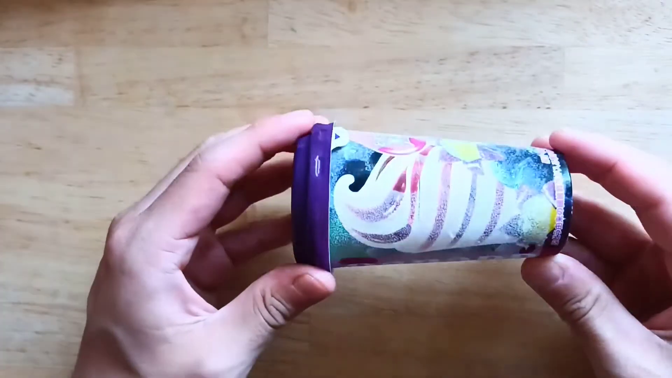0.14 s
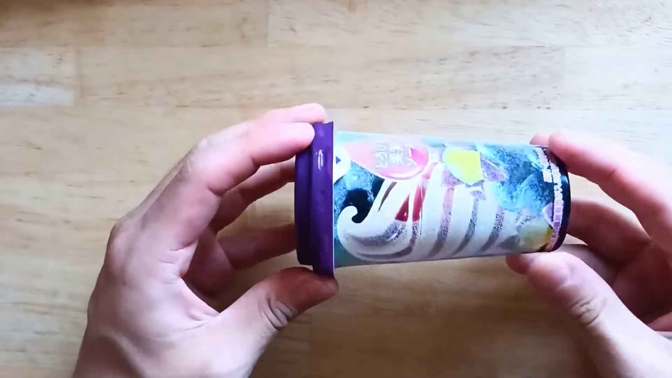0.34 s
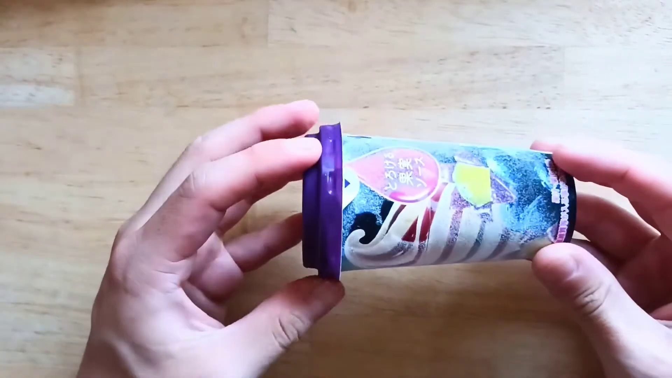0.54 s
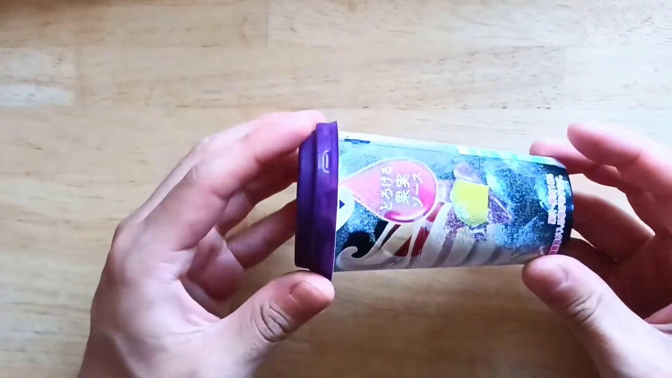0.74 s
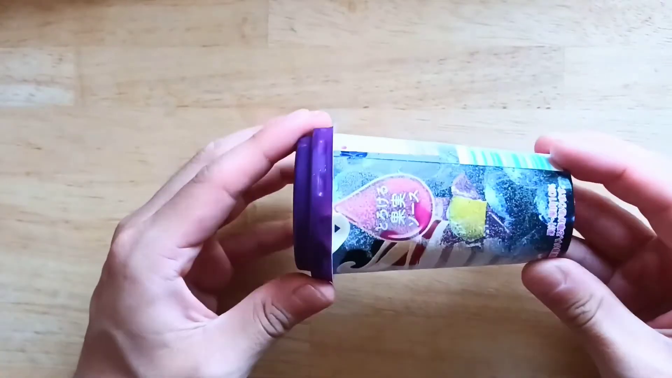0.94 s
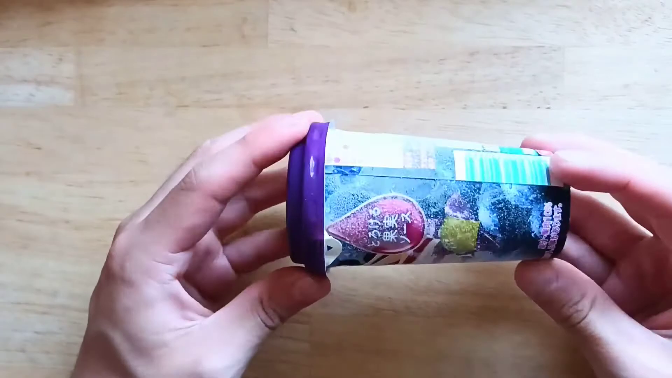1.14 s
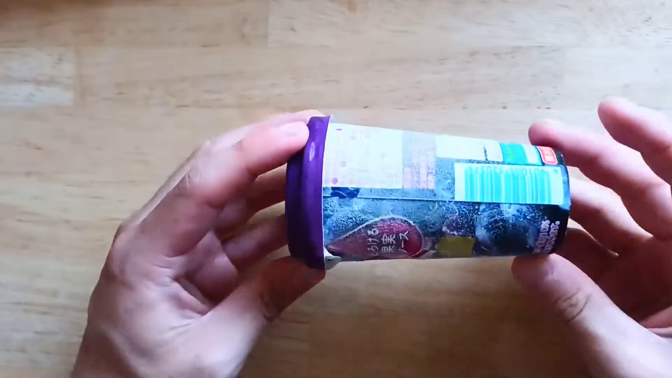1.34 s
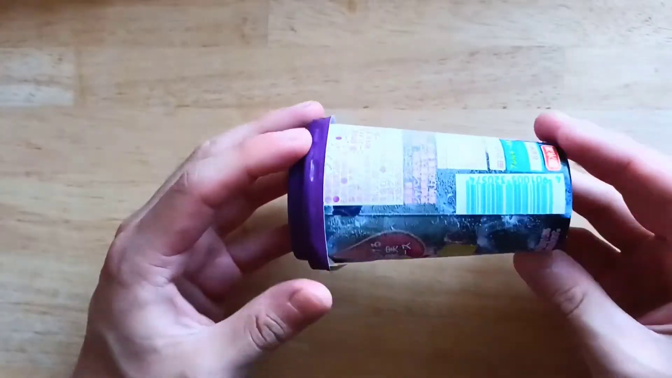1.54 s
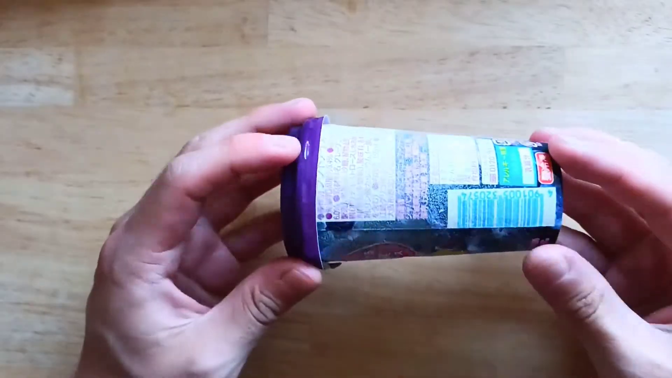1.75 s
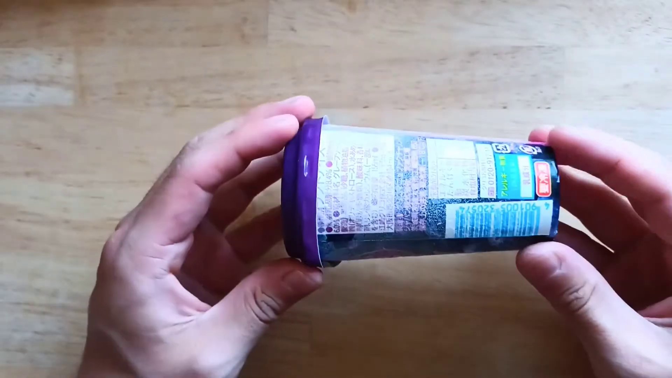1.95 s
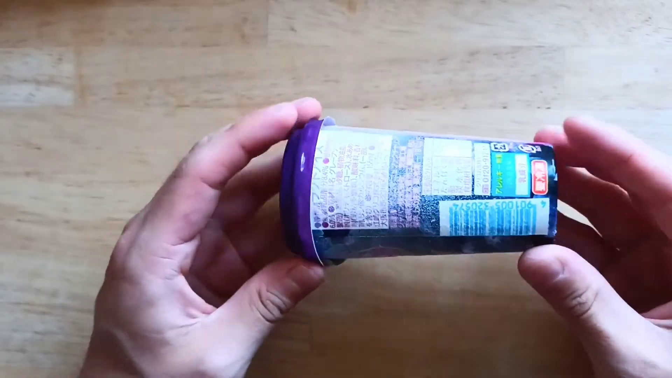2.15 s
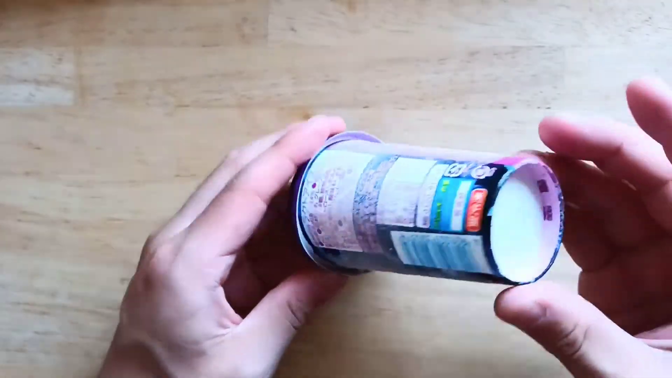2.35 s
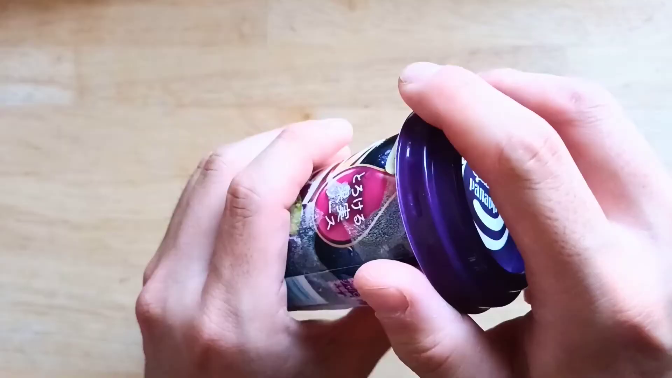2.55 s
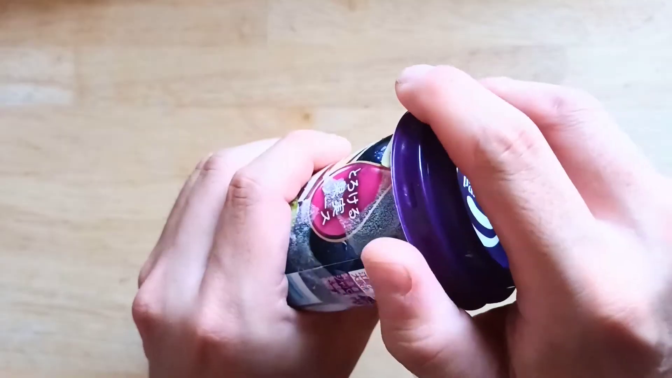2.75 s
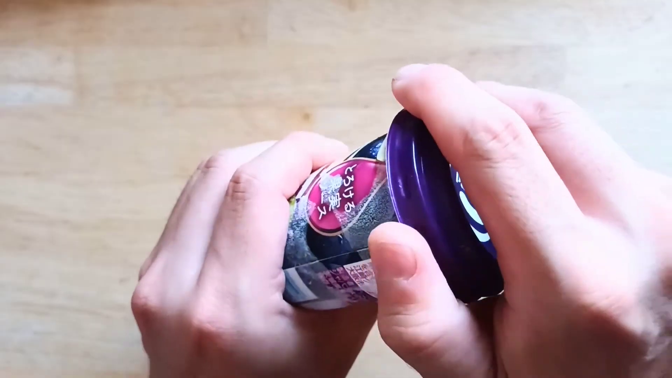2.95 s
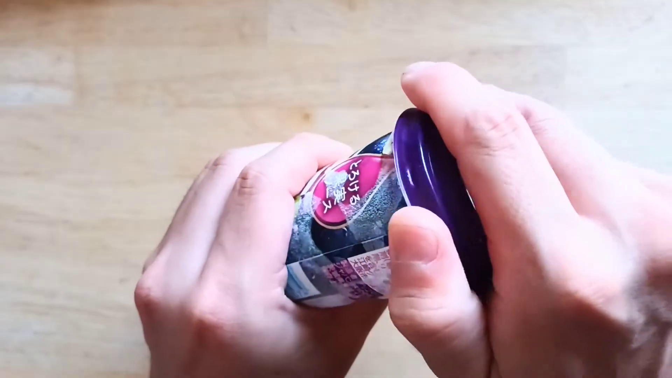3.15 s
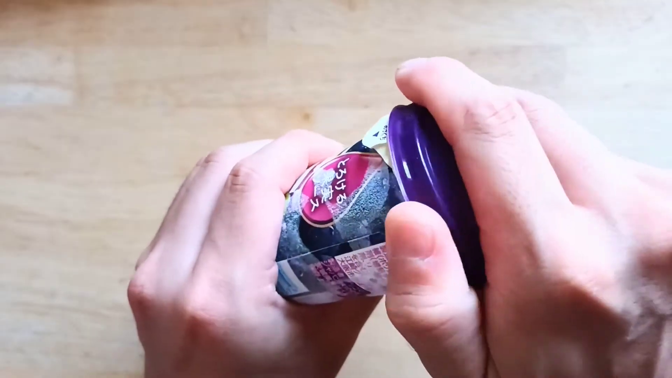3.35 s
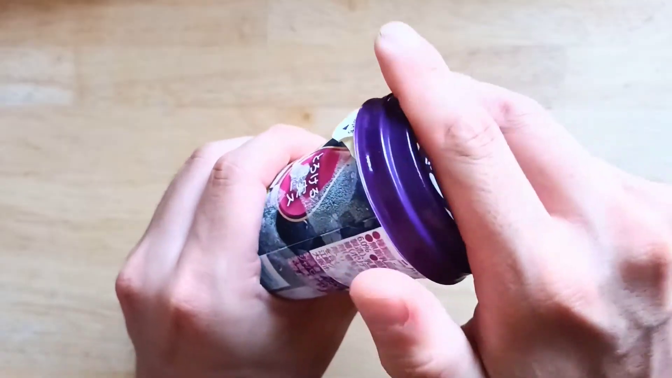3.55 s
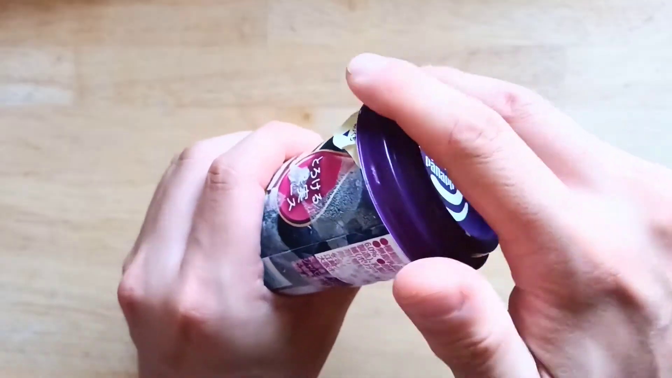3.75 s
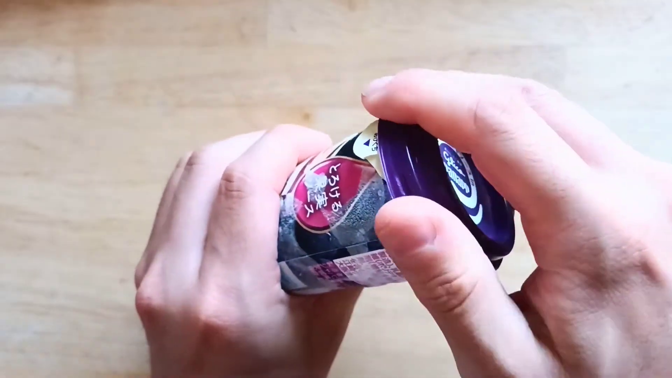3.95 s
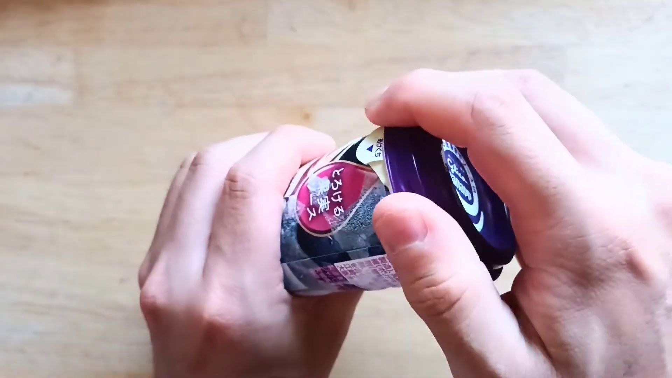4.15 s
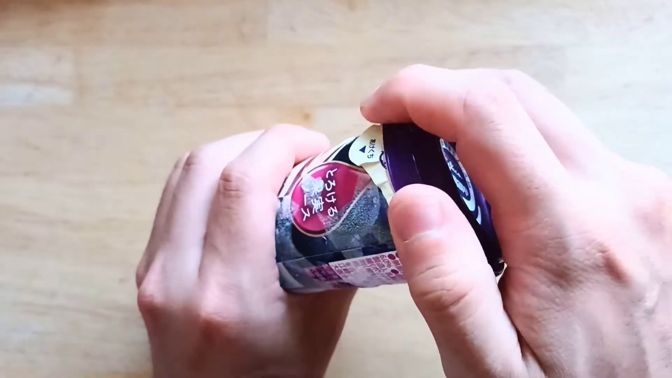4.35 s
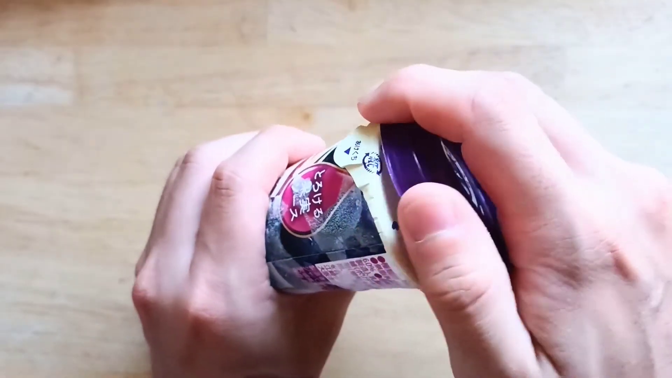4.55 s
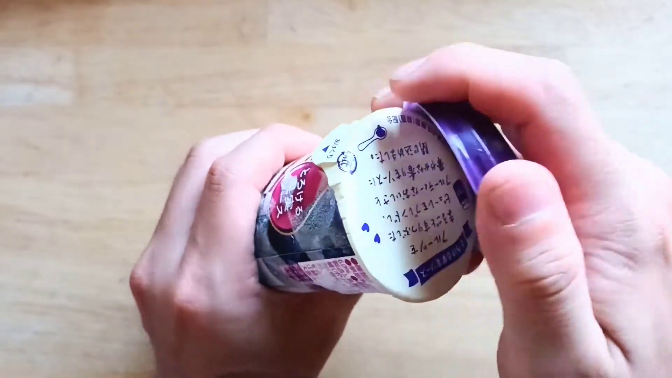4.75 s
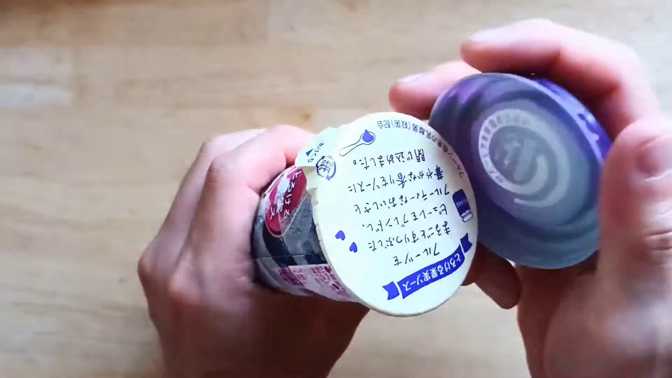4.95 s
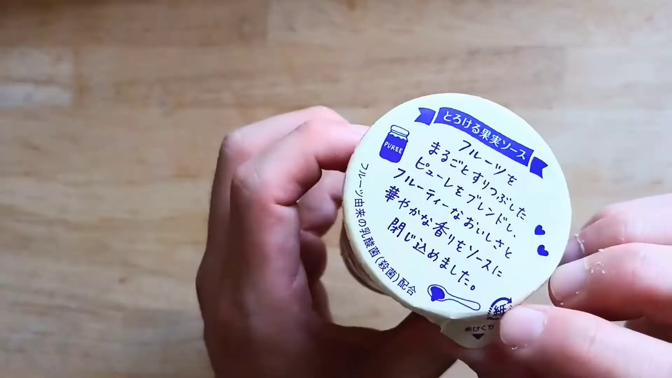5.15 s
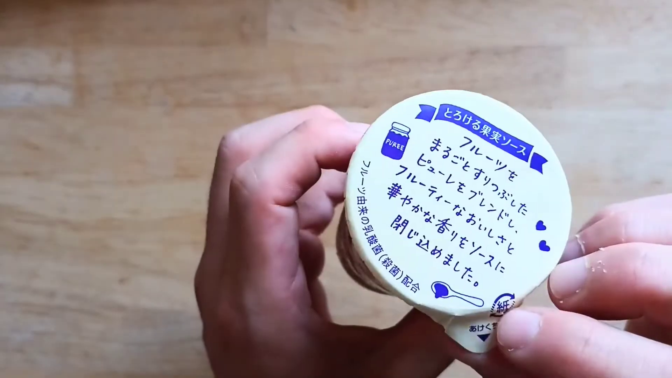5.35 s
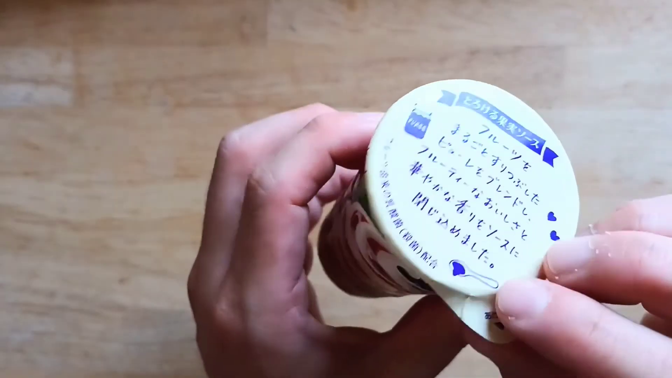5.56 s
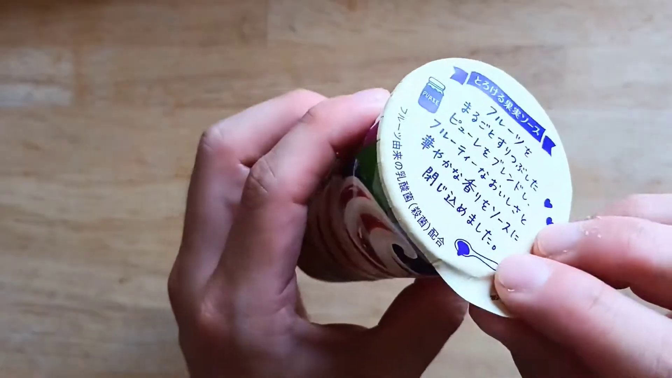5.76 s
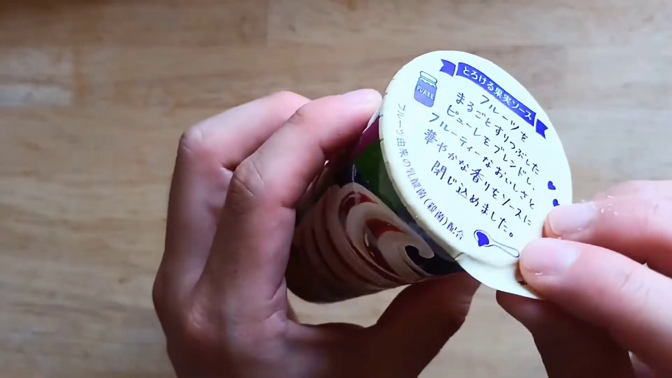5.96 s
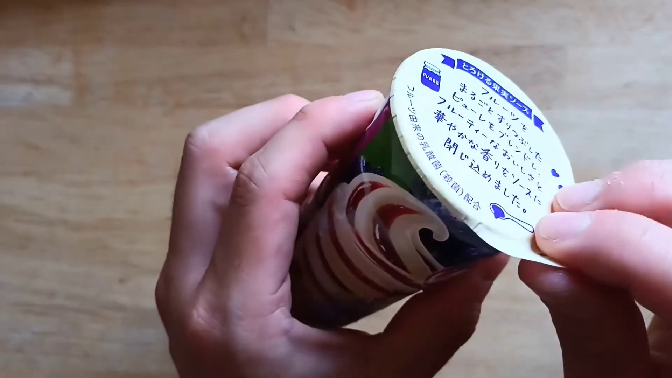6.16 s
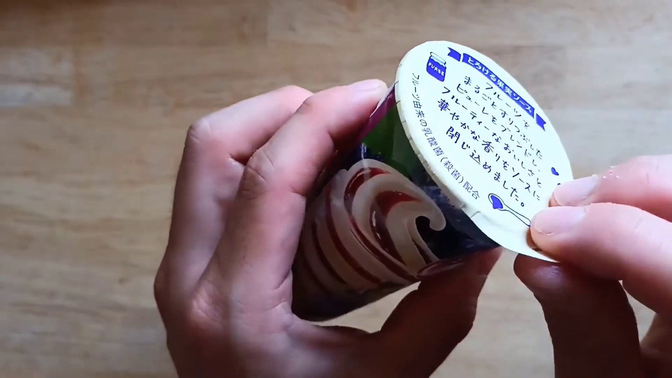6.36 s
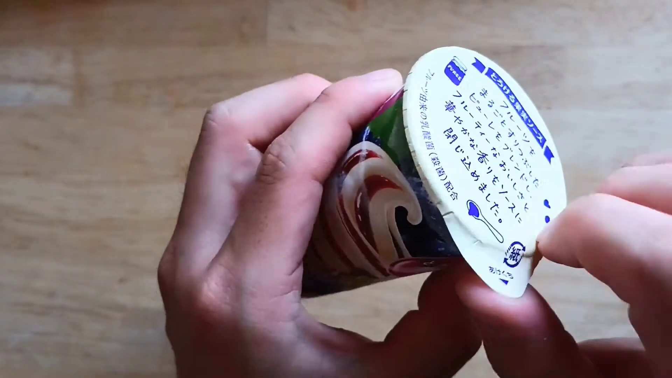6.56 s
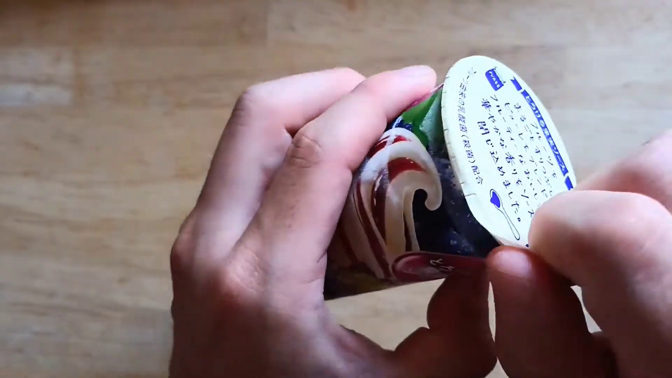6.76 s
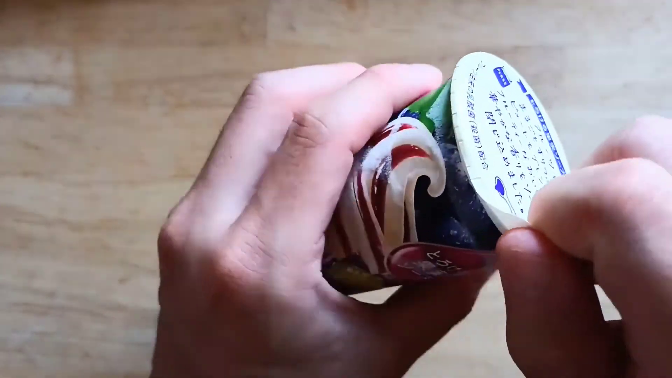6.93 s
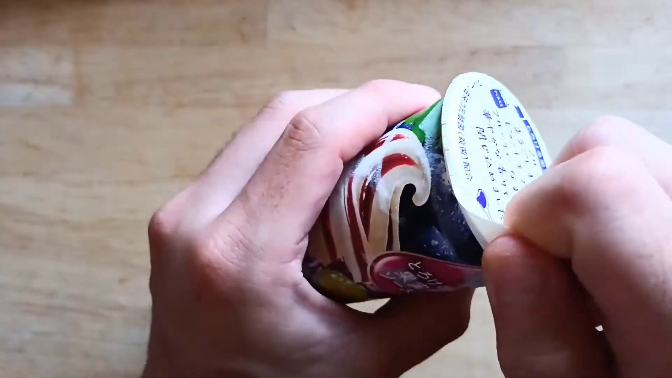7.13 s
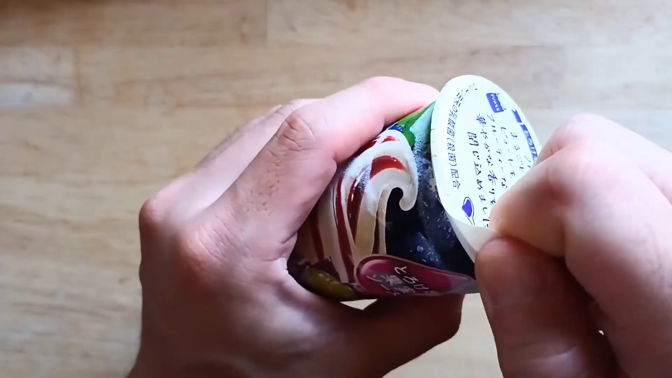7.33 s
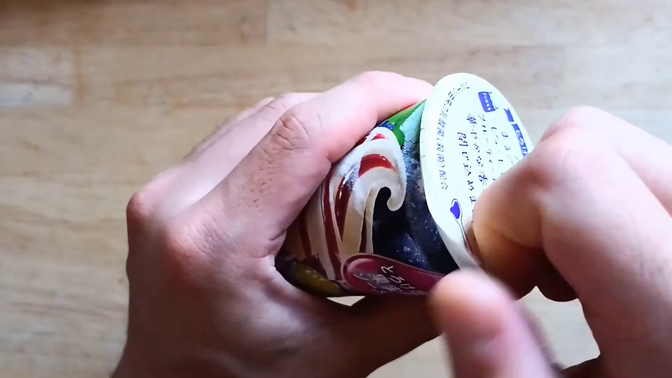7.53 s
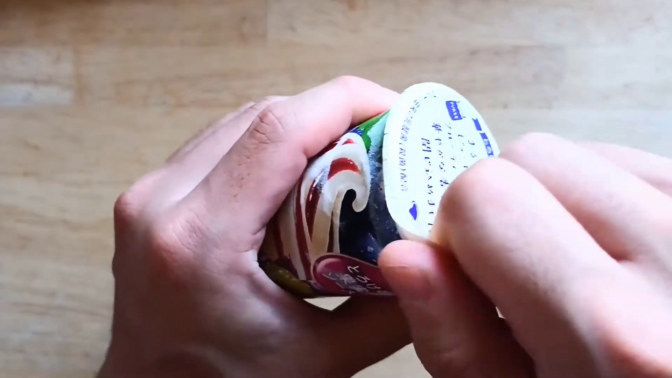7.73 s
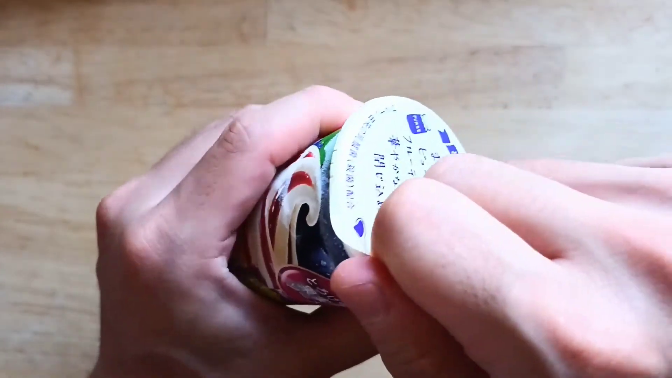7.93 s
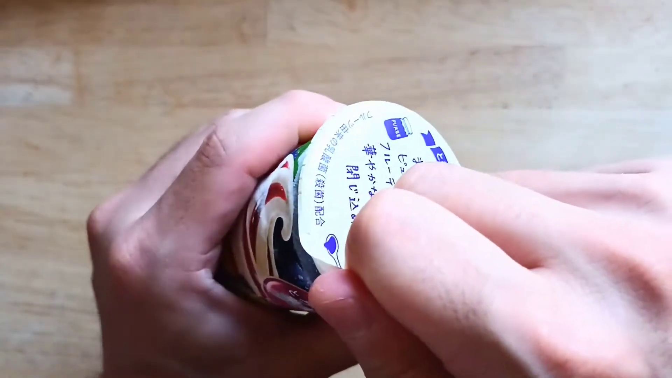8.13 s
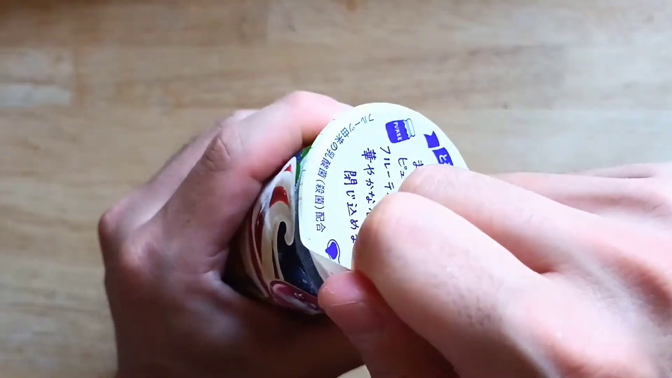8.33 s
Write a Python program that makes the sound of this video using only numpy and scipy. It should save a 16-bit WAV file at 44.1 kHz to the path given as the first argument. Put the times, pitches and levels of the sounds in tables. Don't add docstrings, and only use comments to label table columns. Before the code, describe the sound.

A quiet room with low, steady noise, heard through close stereo microphones, the left louder and fuller. From 0 to 2.2 s fingertips turn a paper cup: faint dry hisses, with small ticks near 1.6 s. Slightly firmer rubs and bright ticks gather from 2.2 to 3.2 s. Around 3.24 s plastic snaps, and at 3.3 s the cap pops loose with a hard, ringing crack and a soft thud. Clicks and dull hollow knocks continue to 4.6 s, then the cap scrapes off the rim with brighter snaps around 4.75 s. A small tap comes at 5.07 s. Very soft picking and rubbing follow, with a tick at 6.75 s. Tension builds from 7.5 s; at 7.75 s the glued seal cracks loudest. Tiny ticks lead to a second fizzy, tearing crack at 8.28 s, followed by crackles and a rustle until 8.5 s. Short, faint reflections answer the sharp sounds.

```python
import sys
import numpy as np
from scipy import signal
from scipy.fft import rfft, irfft, next_fast_len
from scipy.io import wavfile

SR = 44100
rng = np.random.default_rng(int(sys.argv[2]) if len(sys.argv) > 2 else 0)


def field_ratio(decibels):
    return 10 ** (np.asarray(decibels, dtype=float) / 20)


def master_out(mix):
    frames = np.transpose(np.atleast_2d(mix))
    ceiling = np.clip(frames, -1, 1)
    pcm = np.round(ceiling * 32767).astype(np.int16)
    wavfile.write(sys.argv[1], SR, pcm)


N = 374409

# hz, likeness (0 to 1)
FAR_ALIKE = [(3000, 0), (5500, 0), (7200, 0.95), (15000, 1)]


def unit(x):
    return x / np.sqrt(np.mean(x ** 2) + 1e-20)


def along(points, hz):
    point_hz, value = np.transpose(points)
    return np.interp(np.log(hz + 1), np.log(point_hz + 1), value)


def filtered(x, response):
    n = x.shape[-1]
    m = next_fast_len(n + 4096)
    return irfft(rfft(x, m) * response(np.fft.rfftfreq(m, 1 / SR)), m)[..., :n]


def alternating(modes):
    return (-1.) ** np.arange(len(modes))


def ringing(modes, signs=None):
    signs = alternating(modes) if signs is None else signs

    def response(f):
        return sum(sign * field_ratio(db) * 1j * f * width / (hz * hz - f * f + 1j * f * width)
                   for sign, (hz, width, db) in zip(signs, modes))
    return response


def spread(pair, alike, response):
    m = next_fast_len(N + 4096)
    f = np.fft.rfftfreq(m, 1 / SR)
    turn = np.arccos(np.clip(along(alike, f), 0, 1)) / 2
    mid, side = rfft(pair, m) * [np.cos(turn), np.sin(turn)]
    return irfft(np.array([mid + side, mid - side]) * response(f), m)[:, :N]


def lag(f):
    lag_s = 38 / SR
    return np.exp(-1j * np.pi * f * lag_s * np.array([[1], [-1]]))


def cracks(blur):
    # start_s, peak_db, left_over_right_db, broad_snap_db, fizz_db
    bonds = [
        (3.3, -14.5, 8.5, -5.5, -14),
        (7.745, -12, 9, -4, -11),
        (8.2815, -15.5, 12, -10.5, -10),
    ]
    # hz, width_hz, level_db
    cap_modes = [(865, 52, 1), (920, 64, -19), (1273, 250, -1), (1544, 140, 7.5), (1800, 130, -11),
                 (2940, 110, 2), (4510, 110, 3), (6850, 610, -5), (8200, 310, 0)]
    first_seal_modes = [(822, 85, -7), (1140, 380, -10.5), (1464, 43, 2), (1690, 68, 7), (2050, 120, -24),
                        (2320, 43, -23), (2450, 170, -8.5), (2990, 120, 5), (3980, 124, 2), (6600, 250, -5),
                        (9150, 310, -18), (10500, 600, -14)]
    second_seal_modes = [(855, 220, -18), (1130, 120, -6), (1550, 100, -8), (2050, 136, 6.5),
                         (2480, 350, -8.5), (3070, 210, 2), (3720, 270, 1.5), (5240, 210, -1.5),
                         (6380, 390, 3.5), (8700, 700, -6)]
    tear_s = 0.0053
    out, t = np.zeros((2, N + SR)), np.arange(4096) / SR

    def blunt(f):
        return (ringing([(850, 900, 0)])(f) * 1j * f / 850) ** 2 / (1 + 1j * f / 4500) ** 2

    def fibre_tone(f):
        return ringing([(7500, 7000, 0)])(f) ** 2 / (1 + 1j * f / 10500) ** 4

    for bond, bond_modes in zip(bonds, (cap_modes, first_seal_modes, second_seal_modes)):
        start_s, peak_db, pan_db, snap_db, fizz_db = bond
        modes = [(hz, width * blur, db - 10 * np.log10(blur)) for hz, width, db in bond_modes]
        common = rng.standard_normal(len(t))
        own, fibres = rng.standard_normal((2, 2, len(t)))
        tear = (common + own) * field_ratio(-20 * t / tear_s) * (1 - np.exp(-t / .0004))
        push = tear * .08 / blur
        push[:, 12:17] += [0.13, 0.23, 0.29, 0.2, 0.13]
        fizz = filtered(fibres * field_ratio(-60 * t / 0.019) * (t > .0003), fibre_tone)
        for side, sign in enumerate((1, -1)):
            aim = alternating(modes) * field_ratio(rng.normal(0, 1.2, len(modes)))
            snap = ringing([(2100, 2200, snap_db)])
            voice = filtered(push[side], lambda f: (ringing(modes, aim)(f) + snap(f)) * blunt(f))
            voice = voice / np.abs(voice).max()
            voice = voice + field_ratio(fizz_db) * fizz[side] / np.abs(fizz[side]).max()
            out[side, round(start_s * SR):][:len(t)] += field_ratio(peak_db + sign * (pan_db - 9.0) / 2) * voice
    return out[:, :N]


def cup_pitch(s):
    # time_s, pitch_hz
    loudest = [(0, 1500), (4.6, 1520), (4.635, 2650), (4.74, 2010), (7.3, 1950), (7.5, 1600), (7.64, 2050),
               (8.49, 2050)]
    return np.interp(s, *np.transpose(loudest))


def releases():
    # start_s, click_peak_db, click_hz, scrape_peak_db
    bright = [(0.4, -55, 9110, -62), (1.599, -44, 8900, -64), (1.6173, -48, 8240, -64),
              (1.6776, -60, 8200, -65), (2.836, -52, 10370, -64), (2.8618, -41.5, 9740, -55),
              (2.8698, -46, 9600, -76), (2.906, -40.5, 9850, -46), (2.937, -41, 11000, -48),
              (3.0483, -50, 9320, -66), (3.198, -34, 11300, -60), (3.2096, -47, 10110, -58),
              (3.3625, -30.5, 11100, -52), (3.4323, -37, 10400, -48), (3.8022, -39.5, 11500, -69),
              (4.0775, -59, 9990, -76), (4.711, -32, 13900, -55), (4.7358, -31.5, 7200, -50),
              (5.0428, -37.5, 8700, -47), (6.7575, -42.5, 8950, -60), (7.382, -56, 9890, -75),
              (7.605, -53, 8830, -60), (8.1517, -49, 9510, -65), (8.1708, -50, 11640, -70),
              (8.2169, -43.5, 10990, -62), (8.251, -51, 9150, -61), (8.3625, -32, 9320, -55),
              (8.478, -46, 9670, -62)]
    # start_s, cup_peak_db, cup_hz
    dull = [(2.666, -41.5, 1380), (3.5631, -40, 1360), (3.7353, -50, 1570), (3.855, -36.5, 1370),
            (4.13, -37, 1280), (4.41, -46, 1560), (4.522, -33, 1700), (4.6315, -35.5, 1460),
            (4.793, -50, 2210), (6.0285, -41.5, 1800), (7.628, -34, 1400)]
    # start_s, click_peak_db, scrape_peak_db, cup_peak_db, cup_hz
    rim_snaps = [(3.2356, -28, -26, -41, 1790), (3.241, -23.5, -30, -40, 1660),
                 (3.4563, -32, -31.5, -36.5, 2320), (3.898, -35, -59, -37.5, 1320),
                 (3.9732, -33.5, -38.5, -32.5, 1320), (4.745, -29, -26.5, -49, 2440),
                 (5.073, -36.5, -63, -39, 1930), (8.291, -30, -39, -25, 1830),
                 (8.3476, -29, -39, -39, 2050), (8.4533, -45, -47, -50, 2420),
                 (8.4615, -39, -46, -37, 1980)]
    plastic_hz = 8640
    clicks = [(s, db, hz, scrape_db, db - 23, cup_pitch(s)) for s, db, hz, scrape_db in bright]
    knocks = [(s, db - 30, plastic_hz, db - 35, db, hz) for s, db, hz in dull]
    snaps = [(s, db, plastic_hz, *rest) for s, db, *rest in rim_snaps]
    return sorted(clicks + knocks + snaps)


def ticks():
    out, t = np.zeros((2, N + SR)), np.arange(1024) / SR
    t60_s = np.array([[[.009]], [[.008]], [[.0035]]])
    for start_s, click_db, click_hz, scrape_db, cup_db, cup_hz in releases():
        common = rng.standard_normal((3, 1, len(t)))
        own = rng.standard_normal((3, 2, len(t)))
        puff = (common + 0.73 * own) * field_ratio(-60 * t / t60_s) * (1 - np.exp(-t / 0.00022))
        puff[2, :, 4:11] += 1.9 * np.hanning(9)[1:-1]
        click = [(click_hz, 4500, 0)]
        scrape = [(5330, 5400, 0)]
        knock = [(cup_hz, 420, 0), (1.53 * cup_hz, 500, -5), (2.08 * cup_hz, 500, -8)]
        parts = [(click, click_db), (scrape, scrape_db), (knock, cup_db - 3.0)]
        for push, (modes, db) in zip(puff, parts):
            voice = filtered(push, lambda f: ringing(modes, np.ones(len(modes)))(f) ** 2)
            voice = voice / np.abs(voice).max(axis=1, keepdims=True)
            out[:, round(start_s * SR):][:, :len(t)] += field_ratio(db) * voice
    return out[:, :N]


def slides():
    # start_s, length_s, hiss_db
    label_brushes = [(0.024, 0.059, -60.5), (0.11, 0.03, -70), (0.26, 0.07, -73), (0.366, 0.048, -67),
                     (0.626, 0.024, -52.5), (0.77, 0.092, -70), (0.97, 0.055, -74), (1.12, 0.068, -77),
                     (1.268, 0.052, -69), (1.614, 0.08, -68), (3.253, 0.03, -55), (3.47, 0.19, -77),
                     (4.942, 0.04, -70), (5.024, 0.028, -63), (8.014, 0.16, -70.5), (8.21, 0.1, -69),
                     (8.312, 0.087, -51)]
    # start_s, length_s, rise_share (of length), hiss_db, cup_db
    cap_rubs = [(2.223, 0.05, 0.46, -64.5, -70), (2.315, 0.16, 0.5, -69, -69.5),
                (2.57, 0.036, 0.4, -62, -65), (2.663, 0.048, 0.61, -55, -61.5),
                (2.78, 0.06, 0.5, -73, -69.5), (3.198, 0.037, 0.55, -58, -60),
                (3.226, 0.035, 0.68, -42, -43.5), (3.451, 0.016, 0.48, -48.5, -46),
                (3.76, 0.046, 0.5, -58.5, -59.5), (4.174, 0.057, 0.6, -68.5, -64),
                (4.24, 0.14, 0.67, -76, -67), (4.387, 0.11, 0.12, -58, -56), (4.589, 0.056, 0.88, -53, -53),
                (4.628, 0.13, 0.75, -62.5, -58), (4.736, 0.11, 0.15, -65, -56),
                (4.765, 0.13, 0.99, -60.5, -58.5)]
    # start_s, length_s, rise_share (of length), hiss_db
    tab_rubs = [
        (5.052, 0.02, 0.46, -59.5),
        (5.473, 0.057, 0.5, -67),
        (5.538, 0.13, 0.25, -66),
        (6.43, 0.11, 0.3, -69),
        (6.515, 0.2, 0.2, -69),
        (6.723, 0.088, 0.46, -65),
        (7.495, 0.1, 0.94, -66.5),
        (7.602, 0.052, 0.3, -62.5),
        (7.637, 0.14, 0.25, -67),
        (8.433, 0.059, 0.76, -57.5),
    ]
    brushes = [(s, length, 0.47, db, db - 21) for s, length, db in label_brushes]
    picks = [(*row, row[-1] + 0.3) for row in tab_rubs]
    return brushes + cap_rubs + picks


def gritty(response, grit_db, rate):
    # hz, likeness (0 to 1)
    near_alike = [(500, 0.95), (2000, 0.83), (5000, 0.083), (7200, 0.86), (15000, 1)]
    slips = rng.standard_normal(N)[(np.arange(N) * rate / SR).astype(int)]
    pair = rng.standard_normal((2, N)) * field_ratio(grit_db * slips)

    def heard(f):
        lagging = np.clip((7400 - f) / 1400, 0, 1)
        return response(f) * (lagging * lag(f) + 1 - lagging)
    return unit(spread(pair, near_alike, heard))


def strokes():
    # hz, width_hz, level_db
    cup_modes = [(1426, 300, -1), (1950, 430, -1.5), (2860, 240, 3)]
    # hz, level_db (per Hz)
    skin = [(3240, -58), (5500, -6), (8040, 2), (10100, 0), (10800, -3), (11300, -3.5), (14000, -7),
            (16000, -17)]
    # time_s, level_db
    grip = [(0.0, -64), (0.33, -71), (2.22, -69), (2.46, -64), (3.2, -71), (3.36, -52), (3.59, -67),
            (4.87, -64), (5.11, -74), (5.91, -67.5), (6.55, -64.5), (7.57, -67), (7.71, -59), (8.09, -74),
            (8.25, -56.5), (8.49, -55)]
    t, power = np.arange(N) / SR, np.zeros((2 + len(cup_modes), N))
    modes_hz, _, modes_db = np.transpose(cup_modes)
    for start_s, length_s, share, hiss_db, cup_db in slides():
        end_s = start_s + length_s
        a, b = round(start_s * SR), round(end_s * SR)
        loudest_s = start_s + np.clip(share, .05, .95) * length_s
        swell = np.interp(t[a:b], [start_s, loudest_s, end_s], [0, 1, 0])
        near_modes = field_ratio(modes_db - 16 * np.abs(np.log2(modes_hz / cup_pitch(start_s))))
        hum = field_ratio(cup_db + 0.5) * near_modes / np.linalg.norm(near_modes)
        scrape = field_ratio(0.62 * hiss_db + 0.41 * cup_db - 3.5)
        gains = [field_ratio(hiss_db), scrape, *hum]
        power[:, a:b] += np.square(gains)[:, None] * np.sin(swell * np.pi / 2) ** 1.6
    power[0] += field_ratio(np.interp(t, *np.transpose(grip)) - 11.5) ** 2
    layers = [gritty(lambda f: field_ratio(along(skin, f)), grit_db=2.0, rate=2100),
              gritty(lambda f: ringing([(4600, 3000, 0)])(f) ** 2, grit_db=1.5, rate=130)]
    for mode in cup_modes:
        broad = (mode[0], 1600, 0)
        layers.append(gritty(lambda f: ringing([mode])(f) * ringing([broad])(f), grit_db=2.5, rate=500))
    return np.sum(np.sqrt(power)[:, None] * layers, axis=0)


def thuds():
    # start_s, level_db, pitch_hz, t60_s
    landings = [
        (3.24, -42, 237, 0.037),
        (3.3005, -36.5, 410, 0.023),
        (3.972, -40.5, 755, .015),
        (5.0725, -41, 420, 0.011),
        (5.0728, -33, 880, 0.0063),
        (7.575, -44, 775, 0.018),
        (8.472, -46, 230, .05),
        (8.476, -43, 566, .03),
    ]
    out, t = np.zeros(N + SR), np.arange(2048) / SR
    for start_s, db, hz, t60_s in landings:
        push = np.sin(2 * np.pi * hz * t) * field_ratio(-60 * t / t60_s) * (1 - np.exp(-t / 0.00065))
        out[round(start_s * SR):][:len(t)] += field_ratio(db) * push
    return out[:N]


def room(x):
    # hz, t60_s
    decay = [(500, 0.34), (1300, 0.44), (3500, 0.31), (9000, 0.45), (16000, 0.17)]
    # hz, level_db
    wall_level = [(500, -16.5), (1300, -10.5), (2800, -6.5), (5000, -14), (10000, -13)]
    hz, t, z = signal.stft(rng.standard_normal((2, SR // 2)), SR, nperseg=256)
    fading = field_ratio(-60 * t / along(decay, hz)[:, None]) * (1 - np.exp(-t / 0.0023))
    tail = signal.istft(z * fading, SR, nperseg=256)[1]
    wet = signal.fftconvolve(x, tail / np.linalg.norm(tail[0]), axes=1)[:, :N]
    return spread(wet, FAR_ALIKE, lambda f: field_ratio(along(wall_level, f)))


def hiss():
    # hz, level_db (per Hz)
    floor = [(15, -56), (28, -20.5), (60, 0.5), (120, 1), (300, -2), (450, -7), (900, -9.5), (2200, -14),
             (3600, -19.5), (5200, -23.5), (7000, -24.5), (8200, -23.5), (14000, -26), (16300, -25)]
    pair = rng.standard_normal((2, N))
    return field_ratio(-61 + 2.5) * unit(spread(pair, FAR_ALIKE, lambda f: field_ratio(along(floor, f))))


def scene():
    small, rubbing = ticks() + thuds(), strokes()
    near = filtered(cracks(blur=1.15) + small, lag) + rubbing
    all_round = field_ratio(3.5) * cracks(blur=4) + small + rubbing
    return near * field_ratio(2.0) + room(all_round) + hiss()


def roll_off(x):
    return signal.sosfilt(signal.butter(12, 16640, fs=SR, output="sos"), x)


def record(dry):
    # hz, left_over_right_db
    balance = [(60, 10), (110, 9.5), (200, 11.5), (380, 8.5), (700, 11.5), (1290, 11.0), (2380, 11.5),
               (4400, 2.5), (8120, -0.5), (15000, 3.5)]
    share = np.array([[.4], [-.6]])
    mix = filtered(dry, lambda f: field_ratio(along(balance, f) * share) * (f < 15900))
    return roll_off(mix)


dry = scene()
out = record(dry)
master_out(out)
```